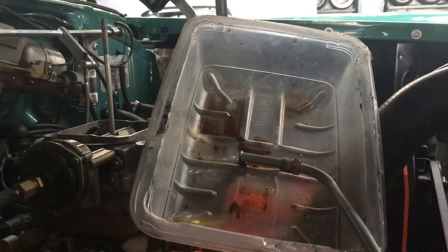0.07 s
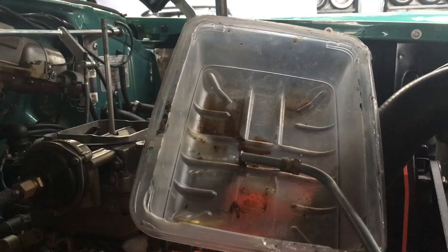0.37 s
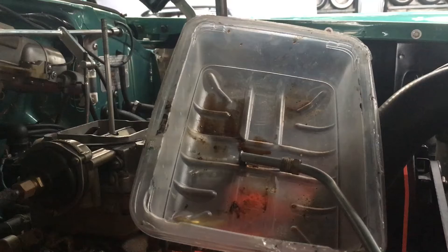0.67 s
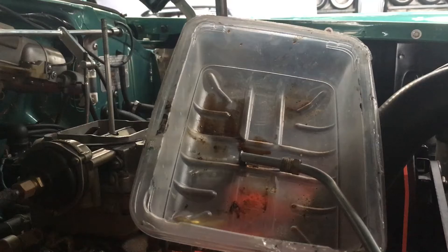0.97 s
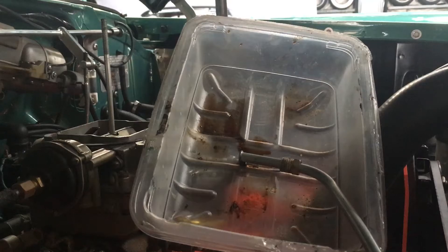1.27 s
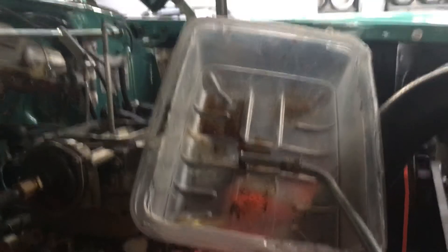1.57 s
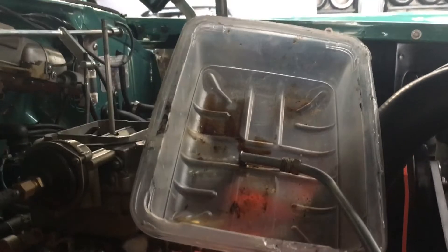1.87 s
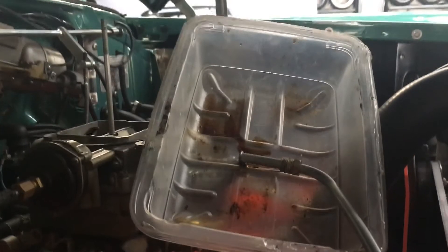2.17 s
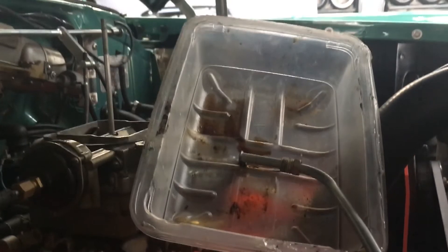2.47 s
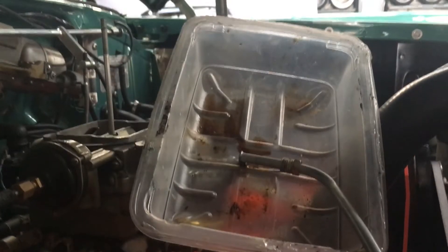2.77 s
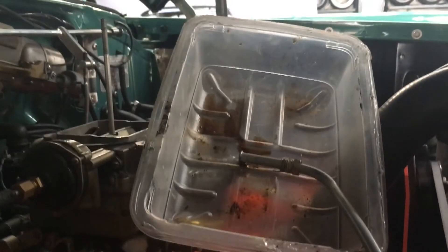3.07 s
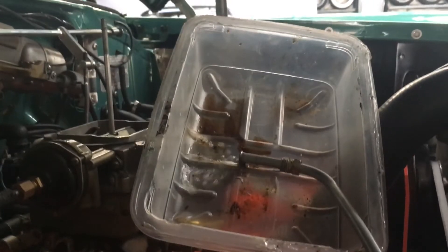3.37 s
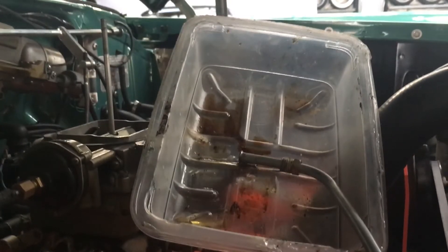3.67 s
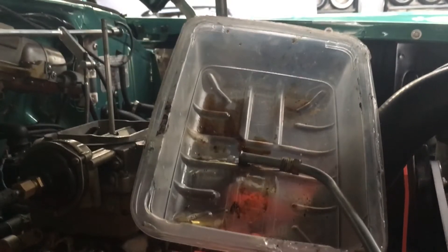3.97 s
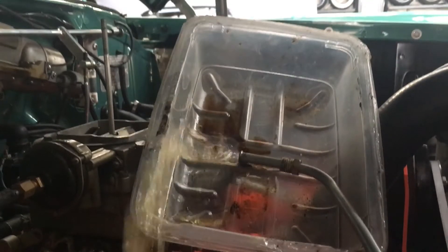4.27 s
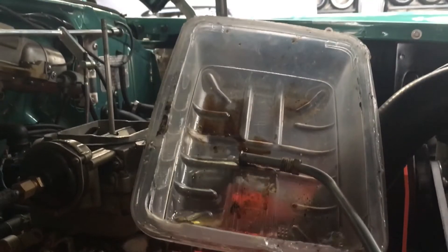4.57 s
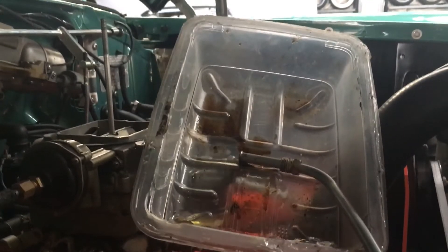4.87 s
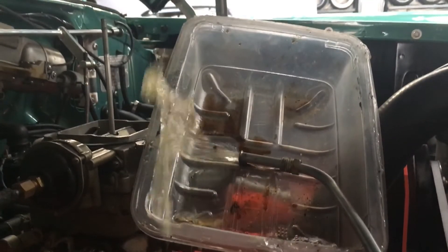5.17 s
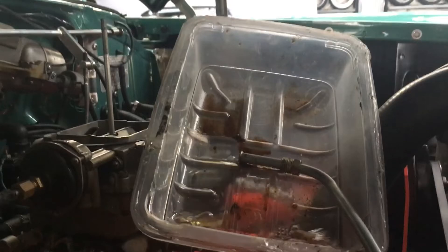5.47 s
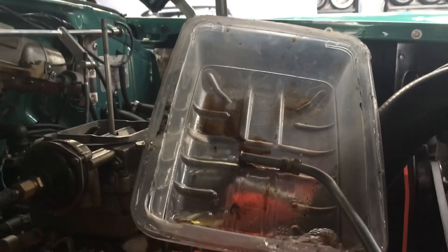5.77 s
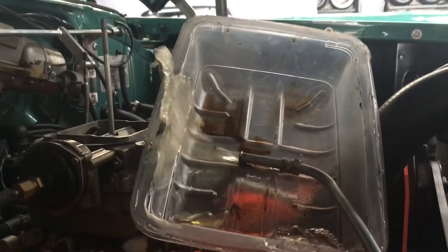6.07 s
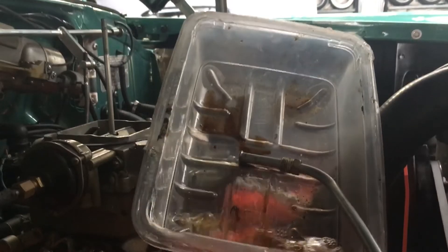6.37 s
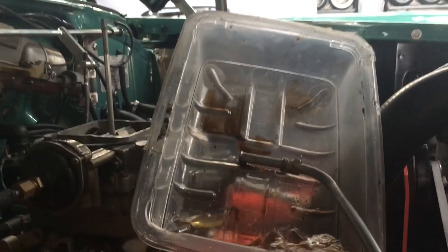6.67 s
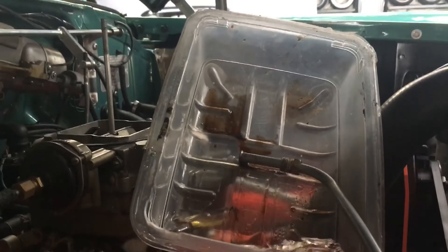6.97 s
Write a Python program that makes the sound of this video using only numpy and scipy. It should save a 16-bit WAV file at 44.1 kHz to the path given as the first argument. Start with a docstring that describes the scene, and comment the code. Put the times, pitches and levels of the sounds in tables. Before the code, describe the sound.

An engine is turned over without starting, heard from close up under the open hood. It begins quietly with hum, light swells of hiss and some muffled knocks. Then the starter slams in and quickly builds to a fast, even chugging, with a groaning gear whine and ringing metal clatter on each pulse. Finally it lets go and briefly spins down.

```python
"""A starter churns an engine that does not fire, heard close by in the open engine bay.
After a few soft bumps over hum and hiss, the pinion slams in and drags the crank up to speed.
Four compressions a turn: the gear teeth whine and grind under each load and clatter on each release,
ringing the housing, the flywheel and the air in the bay. Then the starter drops out and spins down."""
import sys
import numpy as np
from scipy import signal
from scipy.fft import rfft, irfft, next_fast_len
from scipy.io import wavfile
from scipy.ndimage import uniform_filter1d

SR = 44100
rng = np.random.default_rng(int(sys.argv[2]) if len(sys.argv) > 2 else 0)


def transcribe(u):
    """Save the signal u as a 16-bit wav file named by the first command-line argument.

    u: samples, shape (n,) or (channels, n), limited to [-1, 1]; the rate is SR.
    q: integer samples, one column per channel.
    """
    v = np.clip(np.atleast_2d(u).T, -1, 1)
    q = np.round(v * 32767).astype(np.int16)
    wavfile.write(sys.argv[1], SR, q)


N = 317961
TIME = np.arange(N) / SR
PINION_IN_S, PINION_OUT_S, TURN_S = 1.37, 6.835, 0.488

# first heaves of the crank: (time [s], tooth rate [Hz], clatter [dB], grind [dB], whine [dB])
RUN_UP = [(1.4, 135, -47, -28, -32), (1.46, 220.1, -26.5, -23, -28), (1.555, 281.4, -31, -24, -29.5),
          (1.63, 193.2, -33.5, -34, -26.5), (1.711, 151.5, -34, -25, -27),
          (1.794, 291.8, -19, -18.5, -21.5), (1.88, 182.7, -31.5, -25.5, -21.5),
          (1.953, 355, -17, -20, -34), (2.035, 264.3, -27, -24.5, -27.5)]
# crank turns: (start [s], extra clatter [dB], extra grind [dB], extra boom on first release [dB])
TURNS = [(1.853, 0, -2, 0), (2.348, 0, 0, .5), (2.833, -0.35, 0.5, -3), (3.333, -.3, -0.5, 2),
         (3.825, 0, 0, -2), (4.314, 0, -0.2, 3), (4.793, 0, 0.5, -3.5), (5.28, .2, -0.5, 4),
         (5.766, 0, 0, 0), (6.253, 0.2, 0.6, 0), (6.746, 0, -.5, -3)]
# four releases a turn: (phase [turns], tooth rate [Hz], clatter [dB], grind [dB], boom [dB],
# singing [dB], low, middle and high flywheel mode [dB])
RELEASES = [(0, 372, -15, -18, -19, -32.5, -25.5, -29, -31),
            (.227, 389.2, -18, -20, -25.5, -31, -27, -34, -38),
            (.494, 388.6, -20.5, -20.5, -26, -28.5, -45, -23.5, -24),
            (.702, 378, -21.5, -21, -29, -33, -43.5, -28.5, -38)]
# top treble of hiss and clatter: (frequency [Hz], gain [dB])
SIZZLE_COLOUR = [(4500, -6.5), (6000, 5.5), (7500, 0), (9800, -2.5), (12500, 1.5), (15800, -0.5)]


def from_db(db):
    """Decibels to gain."""
    return 10 ** (np.asarray(db) / 20)


def rms_one(x):
    """Scale to unit rms."""
    return x / np.sqrt(np.mean(x ** 2) + 1e-20)


def noise():
    """White noise, rms 1."""
    return rng.standard_normal(N)


def drift(cutoff_hz):
    """Smooth random wander, rms 1."""
    lowpass = signal.butter(2, cutoff_hz, fs=SR, output="sos")
    return rms_one(signal.sosfilt(lowpass, rng.standard_normal(N + SR))[SR:])


def swing(times_s, values, lag_s):
    """Cosine easing from point to point; a negative lag leads."""
    index = np.arange(len(times_s))
    place = np.interp(TIME - lag_s, times_s, index)
    eased = np.floor(place) + (1 - np.cos(np.pi * (place % 1))) / 2
    return np.interp(eased, index, values)


def envelope(start_s, attack_s, hold_s, fall_db_per_s):
    """Linear rise, hold, exponential fall."""
    age = TIME - start_s
    return np.clip(age / attack_s, 0, 1) * from_db(-fall_db_per_s * np.maximum(age - attack_s - hold_s, 0))


def driven(fall_db_per_s, attack_s=0.041):
    """Full while the pinion is in, dying away after."""
    return envelope(PINION_IN_S, attack_s, PINION_OUT_S - PINION_IN_S - attack_s, fall_db_per_s)


def body(x, colour, modes=(), size=16384):
    """Unit-energy filter: a broad colour plus modes (centre [Hz], width [Hz], lift [dB])."""
    hz = np.maximum(np.arange(size // 2 + 1) * SR / size, 1)
    colour_hz, colour_db = np.transpose(colour)
    gain = from_db(np.interp(np.log(hz), np.log(colour_hz), colour_db))
    gain *= np.minimum(hz / colour_hz[0], 1) ** 2 * np.minimum(colour_hz[-1] / hz, 1) ** 2
    for centre_hz, width_hz, lift_db in modes:
        detuning = (hz ** 2 - centre_hz ** 2) / (hz * width_hz)
        gain = gain * (1 + (from_db(lift_db) - 1) / (1 + 1j * detuning))
    response = np.roll(irfft(gain), size // 2)
    return signal.fftconvolve(x, response / np.linalg.norm(response))[size // 2:size // 2 + N]


def housing(lift_share):
    """Modes of the bell housing and nearby panels, with a share of their lift."""
    # (centre [Hz], width [Hz], lift [dB])
    modes = [(634, 28, 9.5), (707, 13, 10), (758, 11.5, 7), (1163, 12, 12.5), (1316, 11, 9.5),
             (1420, 55, 7), (1907, 15.7, 15.5), (2012, 23, 9), (2128, 21, 8.5), (2566, 31, 8),
             (2752, 18, 10.5), (2650, 19, 2), (3008, 22, 9), (3404, 41, 7.5), (3665, 47, 14),
             (3883, 50, 15), (4130, 17, 4.5), (4203, 53, 10.5), (4573, 30, 12.5), (5074, 39, 9.5),
             (5480, 47, 11), (5670, 54, 7), (5260, 25, 2), (5867, 46, 14), (5700, 38, -1), (6085, 42, 11),
             (6590, 28, 12), (7120, 106, 7)]
    return [(hz, width_hz, lift_share * lift_db) for hz, width_hz, lift_db in modes]


def resonate(drive, hz, t60_s, even_s):
    """One driven resonance, levelled to rms 1 over even_s."""
    radius, angle = from_db(-60 / (t60_s * SR)), 2 * np.pi * hz / SR
    ring = signal.lfilter([1, 0, -1], [1, -2 * radius * np.cos(angle), radius ** 2], drive)
    return ring / np.sqrt(np.abs(uniform_filter1d(ring ** 2, int(even_s * SR))) + 1e-6)


def scatter(x, decay_s, count):
    """Early echoes off the metal of the bay comb the treble."""
    delays_s = rng.uniform(0, 3 * decay_s, count)
    gains = rng.standard_normal(count) * np.exp(-delays_s / decay_s)
    echoes = np.bincount((delays_s * SR).astype(int), gains)
    return signal.fftconvolve(x, echoes / np.linalg.norm(echoes))[:N]


def hum(noise_db=-44, tone_hz=97.5, tone_db=-46.5):
    """Low noise with a steady tone in it."""
    # (frequency [Hz], gain [dB])
    colour = [(20, -12), (35, 2), (60, 0), (75, 3.5), (100, 5), (120, 1), (150, -7), (195, -6.5),
              (240, -15.5), (320, -20), (500, -23), (700, -27)]
    tone = from_db(tone_db) * np.sin(2 * np.pi * tone_hz * TIME + 0.3 * drift(3))
    return tone + body(noise() * from_db(noise_db), colour, [(101, 14, 2.0)])


def hiss(floor_db=-71):
    """Soft hiss that brightens as it swells."""
    # (peak time [s], half width [s], level [dB])
    swells = [(.1, 0.23, -55.5), (.7, 0.08, -44.5), (.945, 0.093, -44), (1.16, .075, -43.8),
              (1.37, 0.088, -44.5), (6.97, 0.1, -45.5), (7.15, .045, -44.5)]
    # (frequency [Hz], gain [dB])
    colour = [(300, -14), (500, -11.5), (900, -7.5), (1500, -3), (2300, 0), (3200, -3), (4700, -8),
              (6000, -5.5), (8000, -11), (15800, -21.5)]
    power = sum(from_db(db) ** 2 * np.exp(-((TIME - s) / width_s) ** 2) for s, width_s, db in swells)
    level_db = 10 * np.log10(power + from_db(floor_db) ** 2)
    top = body(noise() * from_db(2.06 * level_db + 41.5), SIZZLE_COLOUR)
    return body(noise() * from_db(level_db), colour) + top


def bumps(rise_s=0.0082, decay_s=0.022):
    """Dull, short knocks before the start."""
    # (time [s], relative level [dB], low-pass [Hz])
    knocks = [(0.174, -49.5, 2600), (.197, -53, 700), (.352, -47.5, 1300), (.37, -50, 700),
              (.432, -41.5, 400), (.458, -48, 900)]
    # (frequency [Hz], gain [dB])
    colour = [(90, -3), (190, 7), (300, 4), (700, -5), (3300, -4), (6000, -22), (15000, -33)]
    out = np.zeros(N)
    for s, db, cutoff_hz in knocks:
        age = np.maximum(TIME - s, 0)
        shape = (1 - np.exp(-age / rise_s)) * np.exp(-np.minimum(age / decay_s, 20))
        lowpass = signal.butter(1, cutoff_hz, fs=SR, output="sos")
        out += signal.sosfilt(lowpass, noise() * from_db(db) * shape)
    return from_db(11) * body(out, colour)


def each_turn(strokes):
    """Strokes repeated in every turn after the run-up: (time [s], stroke values, turn extras)."""
    laid = [(start_s + phase * TURN_S, values, extras)
            for start_s, *extras in TURNS for phase, *values in strokes]
    return [stroke for stroke in laid if RUN_UP[-1][0] < stroke[0] < PINION_OUT_S + TURN_S / 4]


def crank(free_whine_db=-35, boom_dip_db=-4.5, sing_dip_db=-3):
    """The crank races at each release and labours at each compression."""
    # (phase [turns], tooth rate [Hz], clatter [dB], grind [dB], whine [dB])
    compressions = [(.112, 317.9, -23, -24.5, -29.5), (.365, 294.8, -26, -24.5, -30.5),
                    (.6, 310.1, -24.5, -26, -31), (.855, 275, -27.3, -26.8, -32)]
    # rows: (time [s], tooth rate [Hz], clatter [dB], grind [dB], boom [dB], singing [dB], whine [dB])
    rows = [(s, hz, clatter_db, grind_db, clatter_db - 11, grind_db - 10, whine_db)
            for s, hz, clatter_db, grind_db, whine_db in RUN_UP]
    starts_s = [turn[0] for turn in TURNS]
    for s, values, (more_clatter, more_grind, more_boom) in each_turn(RELEASES):
        hz, clatter_db, grind_db, boom_db, sing_db, *_ = values
        boom_db += more_boom * (s in starts_s)
        rows.append((s, hz, clatter_db + more_clatter, grind_db + more_grind,
                     boom_db, sing_db, free_whine_db))
    times_s, _, _, _, booms_db, sings_db, _ = np.transpose(rows)
    for s, values, (more_clatter, more_grind, _) in each_turn(compressions):
        hz, clatter_db, grind_db, whine_db = values
        boom_db = np.interp(s, times_s, booms_db) + boom_dip_db
        sing_db = np.interp(s, times_s, sings_db) + sing_dip_db
        rows.append((s, hz, clatter_db + more_clatter, grind_db + more_grind, boom_db, sing_db, whine_db))
    return np.transpose(sorted(rows))


def tooth_blows(teeth, uneven_db):
    """One uneven click per tooth; bending waves in the iron carry the highs first, making it a chirp."""
    hits = np.flatnonzero(np.diff(np.floor(teeth)) > 0)
    clicks = np.zeros(N)
    clicks[hits] = from_db(uneven_db * rng.standard_normal(len(hits)))
    size = next_fast_len(N + 4096)
    hz = np.arange(size // 2 + 1) * SR / size
    return rms_one(irfft(rfft(clicks, size) * np.exp(-2j * np.sqrt(hz)), size)[:N])


def rattle(teeth, depth, lumpy_db):
    """Dense small contacts, bunched on the front and back flank of each tooth."""
    flanks = 1 + depth * (np.cos(2 * np.pi * teeth) + np.cos(4 * np.pi * teeth))
    return rms_one(noise() * flanks * from_db(lumpy_db * drift(193)))


def block_rumble(tooth_hz, load_db):
    """The block shakes more with speed and a little more under load."""
    # (frequency [Hz], gain [dB])
    colour = [(25, -25), (55, -15), (80, 4.5), (105, -2), (140, 5), (160, -7), (182, 4.5), (220, -12),
              (300, -1.5), (400, -9), (550, -32.5)]
    speed = tooth_hz / RELEASES[0][1]
    shake = driven(fall_db_per_s=24) * np.sqrt(speed) * from_db(-36 + 0.2 * (load_db + 20.5))
    return body(noise() * shake, colour, [(100, 12, 3.6), (179.7, 5.5, 4.0)])


def bay_boom(mesh, level_db):
    """The mesh keeps the air in the bay booming."""
    air = resonate(mesh + 4 * noise(), hz=358.7, t60_s=0.21, even_s=0.038)
    return driven(fall_db_per_s=64) * air * from_db(level_db - 1.67 + 1.27 * drift(29))


def coasting(teeth):
    """The pinion drops out with a clunk and the freed armature whirrs down."""
    # (frequency [Hz], gain [dB])
    colour = [(200, 0), (350, -3), (500, -5), (700, 1), (1200, -3), (1700, -6), (3000, -7), (8000, -32)]
    clunk = from_db(-22) * envelope(PINION_OUT_S, attack_s=0.013, hold_s=0.006, fall_db_per_s=288)
    whirr = from_db(-41.5) * envelope(PINION_OUT_S, attack_s=0.03, hold_s=0, fall_db_per_s=18)
    return body(rattle(teeth, depth=0.28, lumpy_db=-0.5) * np.hypot(clunk, whirr), colour)


def engagement(tooth_hz=330):
    """The solenoid throws the pinion in: it strikes the ring gear, then seats."""
    # (time [s], level [dB], hold [s])
    strikes = [(1.369, -14, 0.0036), (1.382, -7.5, .010)]
    # (frequency [Hz], gain [dB])
    colour = [(88, -53), (150, -39), (327, 3), (430, -12), (919, -2), (1300, -2), (2340, -6), (2630, 1),
              (2840, -9), (3880, -8.5), (5000, -14), (5630, -10), (15800, -13)]
    power = sum((from_db(db) * envelope(s, attack_s=0.004, hold_s=hold_s, fall_db_per_s=950)) ** 2
                for s, db, hold_s in strikes)
    crash = rattle(TIME * tooth_hz, depth=0.097, lumpy_db=2.5)
    return body(crash * np.sqrt(power), colour, housing(0.66))


def flywheel(contacts, flare_s=0.033):
    """Tooth contacts ring the flywheel's modes briefly at each heave and release."""
    # (frequency [Hz], t60 [s], delay after release [s])
    modes = [(1154.2, 0.17, .003), (1908.4, .039, 0.0061), (2700, .014, 0.031)]
    # ring against clatter in the run-up: (low [dB], middle [dB], high mode [dB])
    run_up_rings_db = (-19, -6, -23)
    rings = [(s, np.add(clatter_db, run_up_rings_db)) for s, _, clatter_db, *_ in RUN_UP]
    rings += [(s, values[-len(modes):]) for s, values, _ in each_turn(RELEASES)]
    out = np.zeros(N)
    for mode, (hz, t60_s, delay_s) in enumerate(modes):
        flares = np.zeros(N)
        for s, rings_db in rings:
            age = TIME - s - delay_s
            near = np.abs(age) < 4 * flare_s
            flares[near] += from_db(rings_db[mode]) * np.exp(-(age[near] / flare_s) ** 2)
        out += flares * resonate(contacts, hz, t60_s, even_s=0.068)
    return from_db(-4.5 + 2.1 * drift(22)) * out


def gear_mesh(teeth, flutter_db=4, jitter_rad=0.34):
    """Three harmonics of the tooth rate; backlash shakes their level and phase."""
    phase = 2 * np.pi * teeth + jitter_rad * drift(63)
    tone = np.sin(phase) + from_db(-12) * np.sin(2 * phase) + from_db(-11) * np.sin(3 * phase)
    return rms_one(tone * from_db(flutter_db * drift(65)))


def whine(mesh, level_db):
    """The groaning tone of the mesh, strongest under load."""
    # (frequency [Hz], gain [dB])
    colour = [(80, 10), (170, 5.5), (285, 4.5), (330, -3), (390, -8.5), (470, 6), (560, 3.5), (700, 4),
              (1200, 1.5), (2500, -12)]
    return driven(fall_db_per_s=110) * from_db(level_db) * rms_one(body(mesh, colour))


def singing(teeth, level_db):
    """Overtones of evenly rolling teeth sweep across the housing's modes."""
    # (frequency [Hz], gain [dB])
    colour = [(600, -30), (770, -7.5), (1150, -10.5), (1550, 4.5), (1900, -0.5), (2300, 3.5), (2700, 2),
              (3200, -7), (3900, -1.5), (5000, -9.5)]
    return body(tooth_blows(teeth, uneven_db=3) * from_db(level_db), colour, housing(0.75))


def grind(teeth, level_db):
    """Darker grinding of the teeth as the load returns."""
    # (frequency [Hz], gain [dB])
    colour = [(200, -33), (400, -17), (520, -4.5), (700, -0.5), (950, 0), (1400, -2.5), (1700, 1),
              (2000, 2), (2700, 6), (3300, -1.5), (4500, -16), (9000, -60)]
    contacts = from_db(-1.5) * rattle(teeth, depth=0.05, lumpy_db=2.5)
    contacts += from_db(-9) * tooth_blows(teeth, uneven_db=2.5)
    return body(contacts * from_db(level_db - 3 + 1.5 * drift(20)), colour, housing(0.9))


def sizzle(contacts, clatter_db):
    """Harder contacts are shorter, so the top rises faster than the clatter."""
    top = body(contacts * from_db(1.55 * clatter_db + 0.8 + 1.7 * drift(27.02)), SIZZLE_COLOUR)
    return 0.6 * top + 0.5 * scatter(top, decay_s=0.004, count=90)


def clatter(contacts, level_db):
    """Released teeth clatter brightly through the housing."""
    # (frequency [Hz], gain [dB])
    colour = [(400, -35), (700, -4.5), (1200, -1.5), (2500, -2), (3300, -0.5), (3800, -1.5), (4400, -4.5),
              (4950, -7), (5800, -5.5), (7500, -10), (9800, -7), (15800, -23.5)]
    return body(contacts * from_db(level_db - 0.64), colour, housing(0.95))


def starter(spin_down_s=0.26):
    """The pinion drives the ring gear; tooth rate and levels follow the crank's strokes."""
    times_s, rates_hz, clatter_db, grind_db, boom_db, sing_db, whine_db = crank()
    slowing = np.exp(-np.maximum(TIME - PINION_OUT_S, 0) / spin_down_s)
    tooth_hz = swing(times_s, rates_hz, lag_s=-0.008) * slowing * (1 + 0.011 * drift(60))
    teeth = np.cumsum(tooth_hz) / SR
    contacts = rattle(teeth, depth=0.048, lumpy_db=1) + from_db(-15) * tooth_blows(teeth, uneven_db=4)
    mesh = gear_mesh(teeth)
    gears = (clatter(contacts, swing(times_s, clatter_db, lag_s=0.00041))
             + sizzle(contacts, swing(times_s, clatter_db, lag_s=-0.005))
             + grind(teeth, swing(times_s, grind_db, lag_s=0.034))
             + singing(teeth, swing(times_s, sing_db, lag_s=0.0094))
             + flywheel(contacts))
    return (driven(fall_db_per_s=330) * gears
            + whine(mesh, swing(times_s, whine_db, lag_s=0.0017))
            + bay_boom(mesh, swing(times_s, boom_db, lag_s=0.037))
            + block_rumble(tooth_hz, swing(times_s, grind_db, lag_s=0.024))
            + coasting(teeth))


def scene(start_s=0.119):
    """All sources, the same in both channels, silent until start_s."""
    sound = hum() + hiss() + bumps() + engagement() + starter()
    return np.tile(sound * (TIME > start_s), (2, 1))


def record(dry, low_cut_hz=30, ceiling=0.92, high_cut_hz=15850):
    """Cut the deepest bass, round the highest peaks, cut the top."""
    thin = signal.sosfilt(signal.butter(2, low_cut_hz, "high", fs=SR, output="sos"), dry)
    rounded = thin / (1 + (thin / ceiling) ** 6) ** (1 / 6)
    return signal.sosfilt(signal.ellip(12, 0.1, 80, high_cut_hz, fs=SR, output="sos"), rounded)


dry = scene()
out = record(dry)
transcribe(out)
```